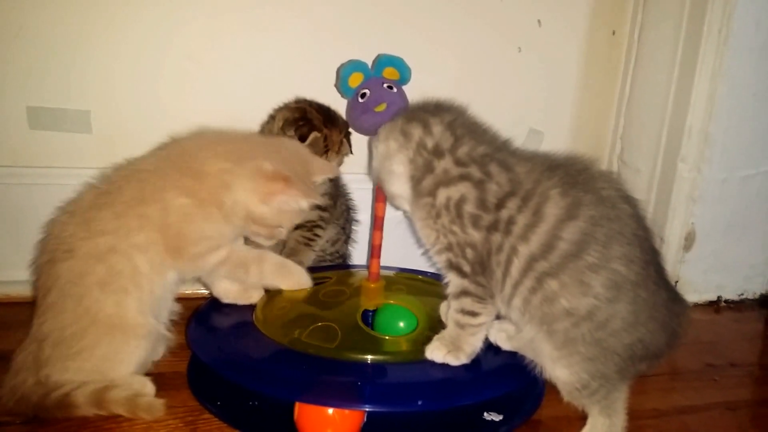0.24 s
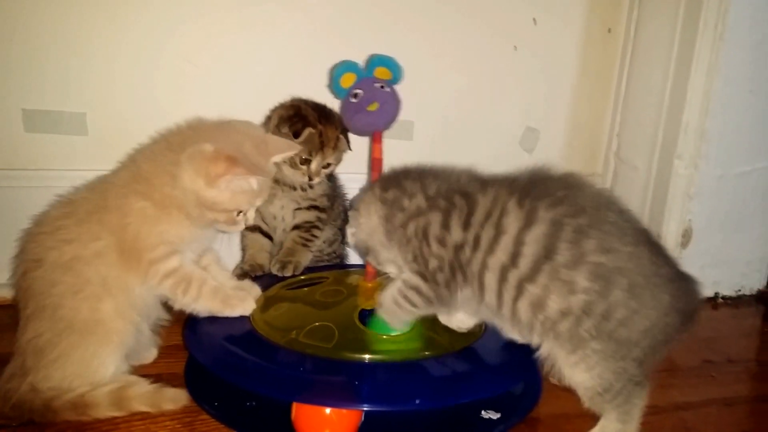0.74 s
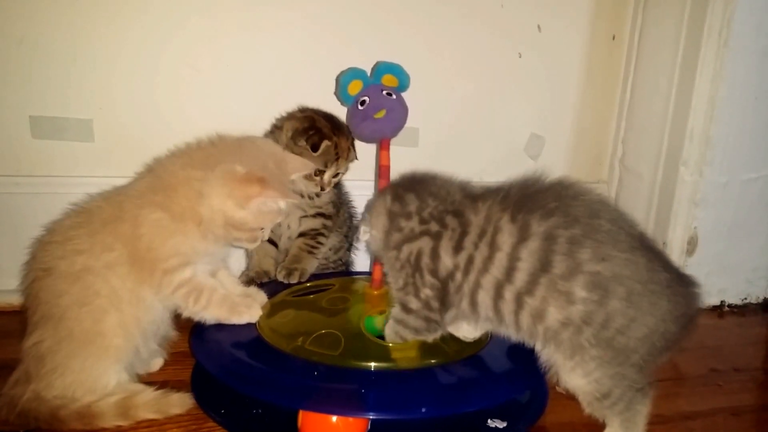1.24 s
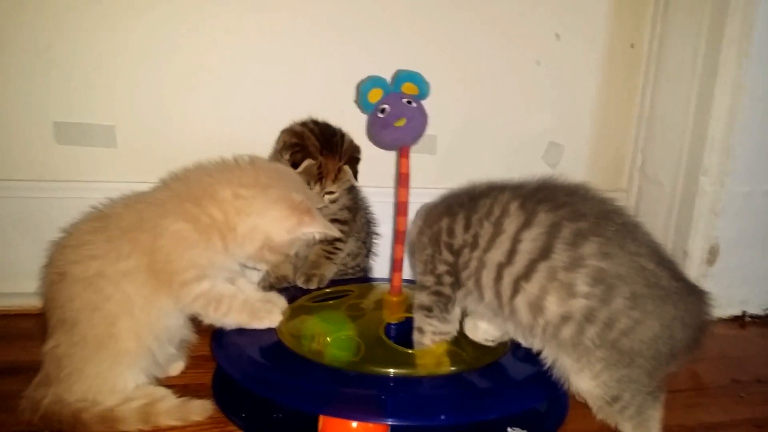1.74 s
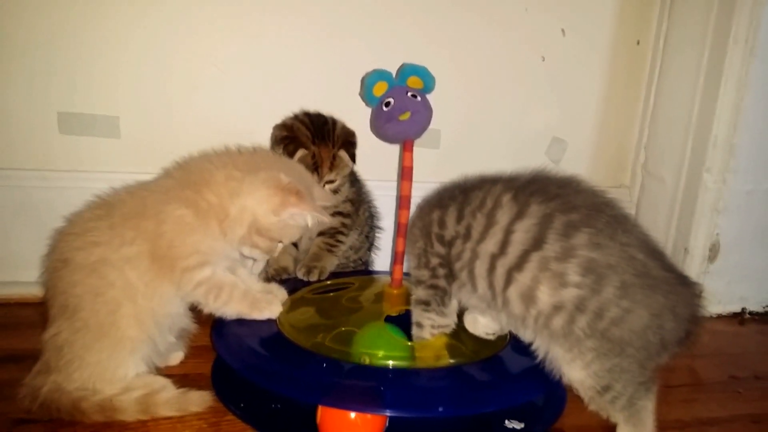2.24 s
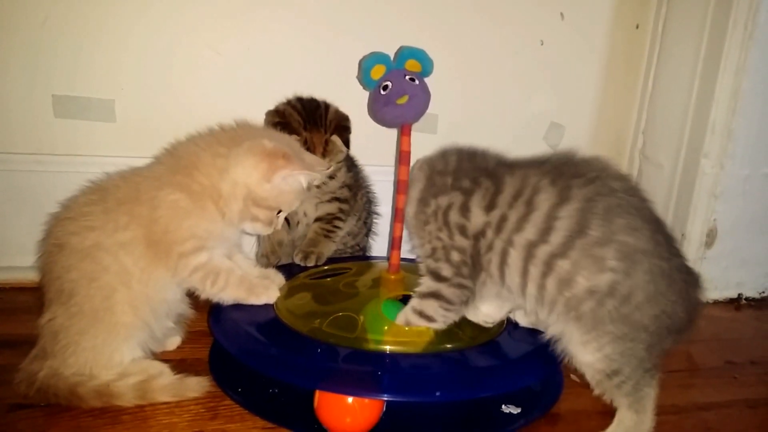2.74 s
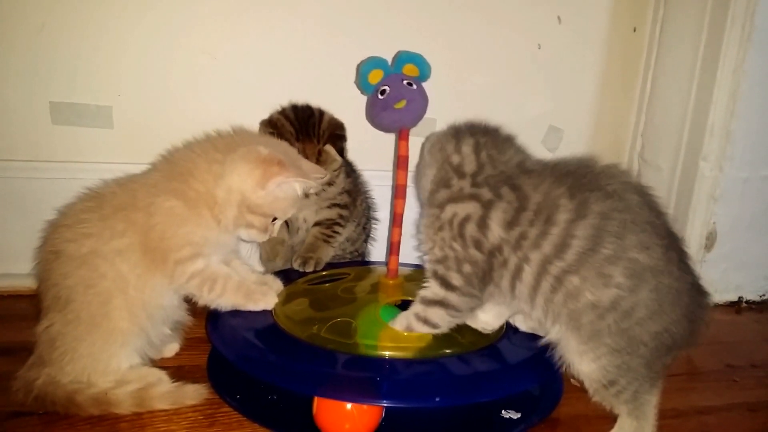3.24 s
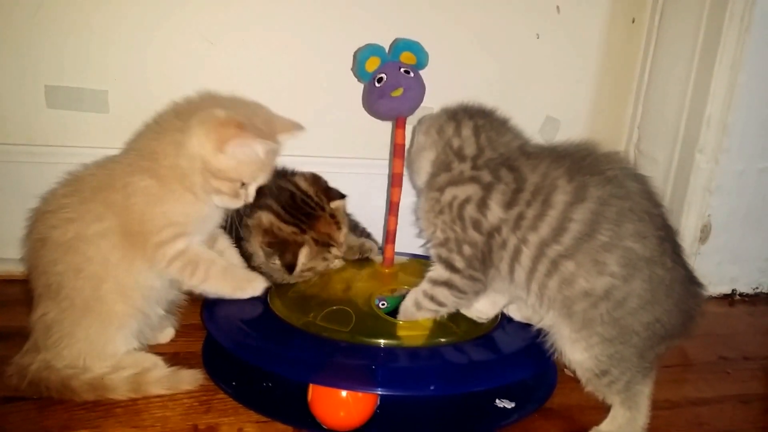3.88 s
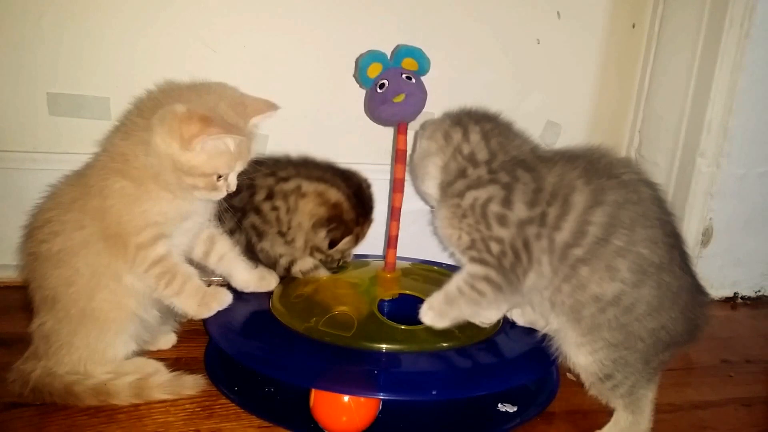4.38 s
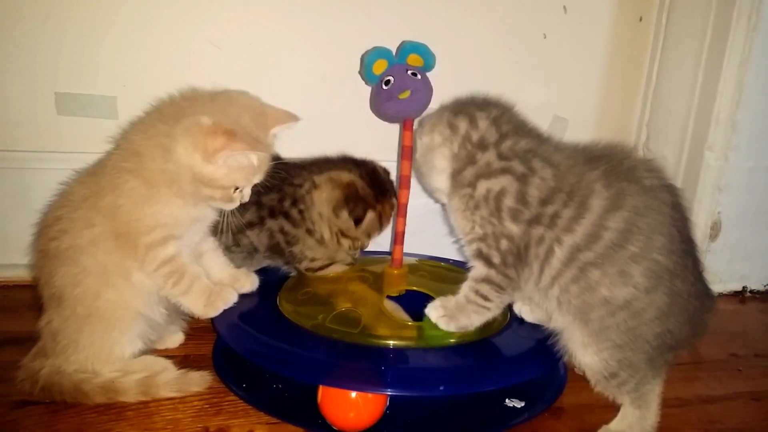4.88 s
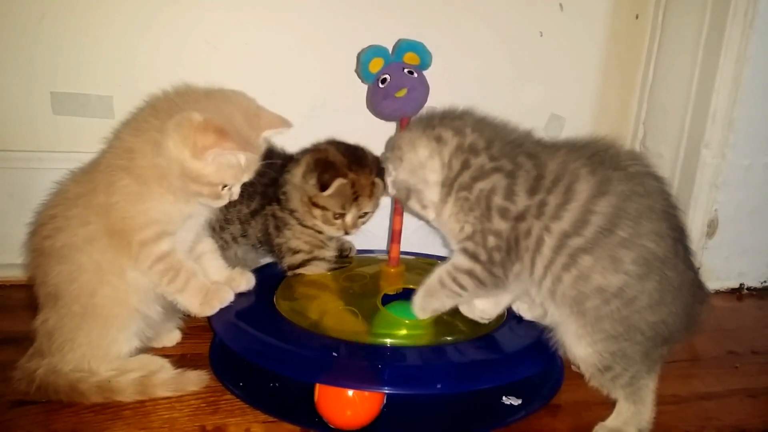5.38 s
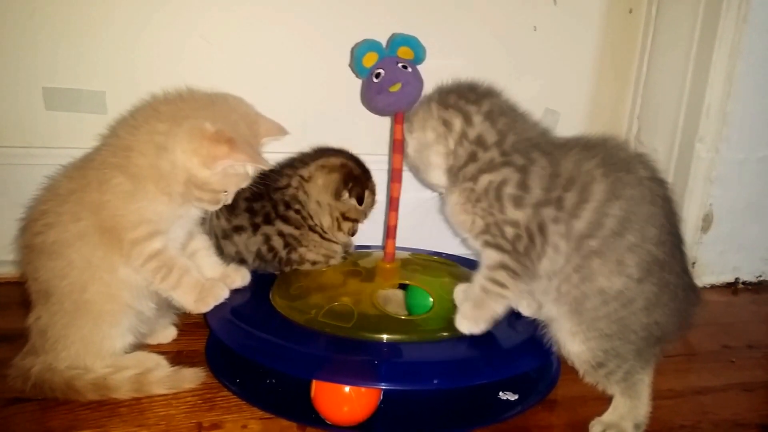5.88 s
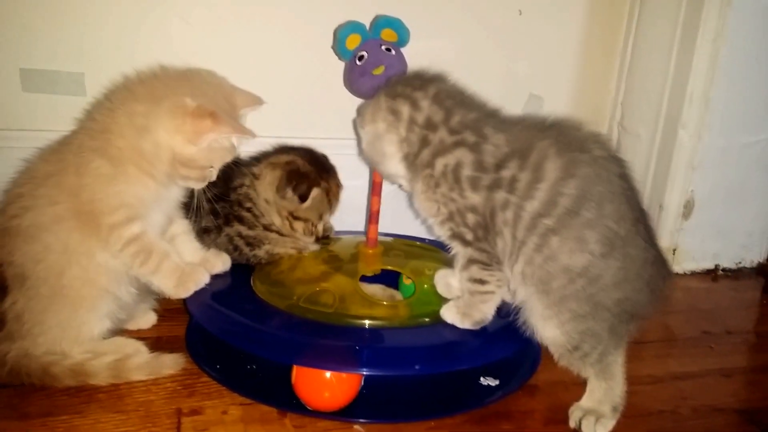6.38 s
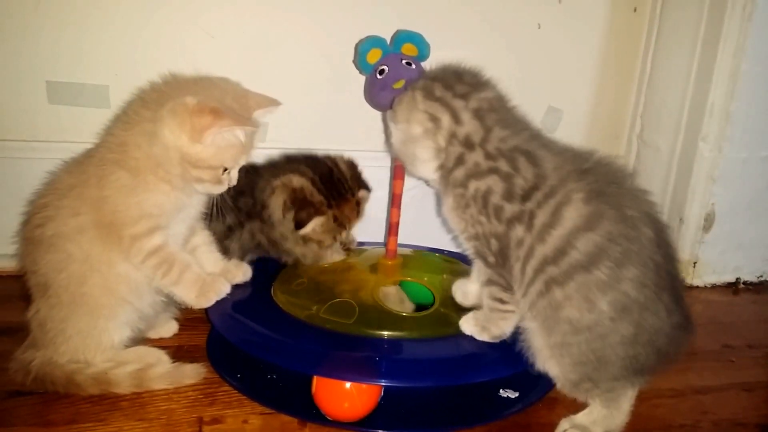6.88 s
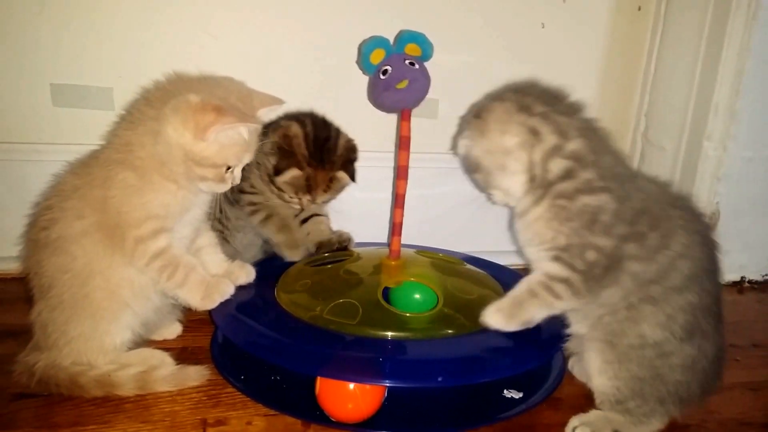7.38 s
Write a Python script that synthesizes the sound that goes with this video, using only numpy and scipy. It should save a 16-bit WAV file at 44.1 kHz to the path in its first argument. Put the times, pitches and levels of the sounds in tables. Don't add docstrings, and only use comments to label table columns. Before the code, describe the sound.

Close stereo microphone in a small bare room with a wooden floor. Faint ball taps come first, then a quick cluster of hollow paw knocks at one second, scattered rattling taps, and a quieter lull. Single swats and loud bursts follow, with claw clicks, lid buzz and short rolling. A distant clock ticks faintly over low house hum and soft hiss.

```python
import sys
import numpy as np
from scipy import signal
from scipy.fft import rfft, irfft, next_fast_len
from scipy.io import wavfile
from scipy.ndimage import uniform_filter1d

SR = 44100
rng = np.random.default_rng(int(sys.argv[2]) if len(sys.argv) > 2 else 0)


def amp(db):
    return 10 ** (np.asarray(db, float) / 20)


def write(x):
    x = np.atleast_2d(x).T
    wavfile.write(sys.argv[1], SR, np.round(np.clip(x, -1, 1) * 32767).astype(np.int16))


N = 336042

# start_s [s], peak_db [dB]
CLOCK_TICKS = [
    (0.311, -47.5),
    (1.5023, -42),
    (2.068, -44.5),
    (3.2635, -45.5),
    (4.4467, -40.5),
    (5.0873, -44),
    (5.657, -45.5),
    (6.2696, -43),
    (7.4739, -45),
]
# time_s [s], level_db [dB]
ROLL_LEVEL = [(0.0, -44), (0.7, -54), (0.9, -34), (1.17, -26), (1.45, -60), (2.45, -56), (2.76, -37.5),
              (3.1, -75), (3.78, -30), (4.05, -82), (4.5, -41), (4.69, -17), (4.85, -46), (5.1, -39.5),
              (5.7, -51.5), (6.45, -85), (7.1, -36), (7.62, -53.5)]
# pitch_hz [Hz], level_db [dB], t60_s [s]
SHELL_AIR = [(442, -4, .14), (490, -9, .1), (526, 0, .2), (591, -1, .17), (646, -8, .1), (700, -9, .08)]
# pitch_hz [Hz], level_db [dB], t60_s [s]
SHELL_WALLS = [(760, -2, .07), (829, -3, .07), (890, -2, .08), (948, -2, .08), (1067, -5, .05),
               (1229, -6, .04), (1369, -6, .04), (1471, -5, .04), (1580, -7, .03), (1800, -10, .02),
               (2100, -8, .025), (2400, -12, .015)]
# pitch_hz [Hz], level_db [dB], t60_s [s]
FLOORBOARDS = [(146, -3, .14), (184, 0, .2), (205, -3, .15), (290, -6, .15), (330, -9, .12)]
# pitch_hz [Hz], level_db [dB], t60_s [s]
CLOCK_MODES = [(2000, -7, .004), (3200, -6, .003), (4600, -9, .002), (6100, -7, .002), (7400, -5, .002),
               (8500, -2, .004), (9800, -5, .002)]
# pitch_hz [Hz], t60_s [s]
ROOM_DECAY = [(100, 0.82), (300, 0.23), (700, 0.36), (1800, 0.45), (5000, 0.38), (12000, 0.21)]
# pitch_hz [Hz], level_db [dB per Hz]
HOUSE_SPECTRUM = [(15, -60), (25, -45), (43, -47), (59, -29), (79, -5), (135, -6.5), (279, -10.5),
                  (412, -28), (525, -13.5), (588, -18.5), (1200, -37.5), (1560, -74), (2640, -120)]
# pitch_hz [Hz], likeness [0-1]
STEREO_LIKENESS = [(60, 1), (300, 0.94), (600, 0.62), (1200, 0.53), (3000, 0), (12000, 0)]
# pitch_hz [Hz], left_minus_right_db [dB]
PORT_SHADING = [(60, -4), (250, -4.5), (1000, -5.8), (2200, -6), (3200, 0), (4300, 4), (5600, 0),
                (7200, -11), (10000, -10), (13000, -4)]
# pitch_hz [Hz], level_db [dB per Hz]
HISS_SPECTRUM = [(600, -5), (1000, -6.5), (1500, -8), (2200, -7.5), (3200, -12.5), (4300, -12.5),
                 (5300, -14), (6500, -6.5), (8200, -15.5), (10500, -20.5), (12200, -17.5), (14500, -20.5)]
# start_s [s], peak_db [dB], hardness_db (upper modes) [dB], pitch_hz (favoured air) [Hz], ring_length [0-1]
PAW_SWATS = [(0.991, -7.5, -14, 530, 0.31), (1.03, -4, -15, 554, 0.28), (1.08, -7, -11.5, 517, 0.34),
             (1.177, -21, -19, 503, 0.67), (2.642, -8.5, -12.5, 675, 0.54), (3.611, -8, -9.5, 585, 0.38),
             (3.633, -7.5, -7.5, 606, 0.43), (3.649, -10.5, -13.5, 590, 0.55),
             (3.72, -3.5, -10.5, 556, 0.37), (3.743, -1.5, -20.5, 450, 0.43),
             (3.762, -4.5, -12.5, 506, 0.33), (3.823, -8, -22.5, 527, .1), (4.504, -9, -10.5, 610, 0.23),
             (4.608, -0.5, -20, 520, 0.21), (4.636, -12, -17, 530, 0.37), (4.67, -18, -20, 487, 0.8),
             (4.725, -13.5, -19.5, 525, .35), (5.815, -0.5, -13, 607, 0.39), (5.854, -8, -19, 520, 0.3),
             (5.921, -10, -12.5, 518, 0.44), (5.957, -19, -22, 576, 0.24), (6.956, -1, -19.5, 478, 0.2),
             (7.085, -5.5, -14, 525, 0.34), (7.119, -13, -16.5, 516, 0.43)]
# start_s [s], peak_db [dB], hardness_db [dB], pitch_hz (favoured air) [Hz]
BALL_TAPS = [(0.209, -26, -14, 616), (0.422, -33, -25, 596), (0.641, -53.5, 4.5, 613),
             (0.884, -30, -25, 594), (0.921, -35, -3.5, 528), (1.273, -21.5, -9.5, 550),
             (1.304, -25.5, -23, 613), (1.39, -20.5, -17.5, 560), (1.43, -24.5, -24.5, 553),
             (1.493, -18.5, -20.5, 537), (1.641, -22, -17.5, 547), (1.751, -20, -15.5, 595),
             (1.826, -28, -20.5, 526), (1.883, -30.5, -20.5, 553), (1.931, -27, -21, 580),
             (2.042, -27, -24, 540), (2.063, -30.5, -16.5, 520), (3.502, -38, -13.5, 610),
             (4.297, -29.5, -13, 520), (4.389, -22.5, -23, 620), (4.487, -25, -17, 573),
             (4.798, -22, -10.5, 530), (4.933, -29, -30, 540), (5.013, -26.5, -22, 535),
             (5.253, -30.5, -16, 532), (5.773, -27.5, -12, 595), (6.191, -22.5, -13.5, 563),
             (6.215, -17.5, -13.5, 560), (6.851, -16.5, -17.5, 605), (6.906, -19, -24.5, 650)]
# start_s
# [s], peak_db [dB]
BALL_NUDGES = [(0.274, -48), (0.709, -49), (6.945, -20), (0.831, -39.5), (1.105, -15), (1.132, -18.5),
               (1.24, -29), (1.37, -32.5), (1.651, -25.5), (3.784, -14), (2.309, -46), (3.55, -33),
               (3.802, -15.5), (4.448, -43), (4.535, -29), (4.711, -15), (5.167, -34), (5.226, -46),
               (5.328, -34.5), (5.374, -39), (5.749, -33.5), (5.845, -15), (5.994, -42), (6.11, -39),
               (6.251, -28.5), (6.62, -42)]
# start_s [s], peak_db [dB], top_db (share above 5
# kHz) [dB]
CLAW_CLICKS = [(0.6714, -40, -9), (0.7646, -45, -14), (0.8083, -36, -5), (0.8735, -32, -11.5),
               (1.0147, -37.5, 4), (1.0406, -12, -19), (1.6493, -44, -30), (2.6075, -59, 2),
               (2.642, -39.5, 2.5), (3.5289, -38, -12), (3.631, -32, 2.5), (3.721, -24, -12),
               (3.8211, -21.5, -8.5), (4.2961, -32, -29), (4.6067, -12, -24), (4.6964, -28, -24),
               (5.3769, -30.5, -17.5), (5.49, -60, 4), (5.794, -49.5, -1), (5.811, -15, -27),
               (5.945, -45, -10), (6.849, -36, -18.5), (7.0828, -21, -36)]
# peak_s [s], level_db [dB], half_length_s [s]
RUMBLE_SWELLS = [(0.0, -43, 0.11), (1.1, -37, 0.25), (1.85, -36.5, 0.39), (2.67, -40.5, 0.11),
                 (3.3, -50, 0.13), (3.75, -32.5, 0.12), (4.1, -43.5, 0.25), (4.65, -40.5, 0.18),
                 (5.1, -39, 0.26), (5.9, -38, .15), (6.25, -45, 0.082), (6.97, -41, 0.064),
                 (7.36, -35, 0.16)]
# time_s [s], level_db [dB]
FUR_RUSTLE = [(0.0, -61.5), (0.6, -67), (1.3, -62.5), (2.4, -67.5), (3.3, -69), (4.2, -69.5), (5.1, -64),
              (6.6, -71), (7.62, -61.5)]
# start_s [s], peak_db [dB]
WEIGHT_THUDS = [(0.921, -41.5), (1.08, -32), (1.105, -34), (2.642, -27.5), (2.657, -35), (3.762, -26.5),
                (4.608, -31), (4.67, -39), (5.013, -42), (5.374, -48), (5.921, -32.5), (5.957, -35),
                (6.956, -43), (7.085, -30), (7.119, -28.5)]
# pitch_hz [Hz], level_db [dB], t60_s [s]
LID_MODES = [(1478, -3, 0.095), (2083, -2, 0.11), (2248, -5, 0.05), (2695, -1.5, 0.038), (3250, -7.5, .06),
             (3583, -9, 0.053)]

NUDGE_HARD_DB, NUDGE_HZ = -18, 535
REBOUND_S, REBOUND_LOSS_DB = .014, 11
LIGHT_WEIGHT_DB, WEIGHT_SLOPE = -18.5, -0.62
RING_SHARE, DAMP_PER_DB = 0.59, -0.0166
SWAT_CRACK_DB, TAP_CRACK_DB, NUDGE_CRACK_DB = -3, -4.5, -7
SWAT_TOP_DB, LIGHT_TOP_DB = -13.5, -17.5
SCUFFLE_DB, SCUFFLE_T60_S = -54, 0.54
HOUSE_DB, RUMBLE_FLOOR_DB = -57.5, -54.5


def at_hz(points, hz):
    table = np.array(points)
    return np.interp(np.log(hz), np.log(table[:, 0]), table[:, 1])


def in_time(rows):
    s, level_db = np.transpose(rows)
    return amp(np.interp(np.arange(N) / SR, s, level_db))


def rms_one(x):
    return x / np.sqrt(np.mean(x ** 2) + 1e-20)


def band(x, low_hz, high_hz):
    sos = signal.butter(2, [low_hz, min(high_hz, .45 * SR)], "band", fs=SR, output="sos")
    return signal.sosfilt(sos, x)


def coloured(x, gain_of_hz):
    size = next_fast_len(N)
    hz = np.maximum(np.fft.rfftfreq(size, 1 / SR), 1)
    return irfft(rfft(x, size) * gain_of_hz(hz), size)[..., :N]


def train(times, sizes):
    out = np.full(N, 1e-18)
    at = np.clip((np.asarray(times) * SR).astype(int), 0, N - 1)
    np.add.at(out, at, sizes)
    return out


def die_away(hits, t60_s):
    return signal.lfilter([1], [1, -amp(-60 / (t60_s * SR))], hits)


def ring(clicks, hz, t60_s):
    r, w = amp(-60 / (t60_s * SR)), 2 * np.pi * hz / SR
    return signal.lfilter([0, np.sin(w)], [1, -2 * r * np.cos(w), r * r], clicks)


def strike(times, level_db, modes, scatter_db, apart, rise, length=1.0):
    hz, mode_db, t60 = np.transpose(modes).astype(np.float32)
    spread = (hz[:, None] / 1000) ** 3
    out = np.zeros((2, N + SR))
    t = np.arange(int(SR * min(.6 * t60.max(), .15)), dtype=np.float32) / SR
    luck = rng.standard_normal((len(times), 3, len(modes))).astype(np.float32)
    levels = amp(np.reshape(level_db, (len(times), -1)) + mode_db + scatter_db * luck[:, 0])
    lengths = np.broadcast_to(length, len(times))
    swell = (1 - np.exp(-np.outer(hz, t) / rise)) ** 2
    for s, level, (_, detune, side), share in zip(times, levels, luck, lengths):
        phase = 2 * np.pi * np.outer(hz * (1 + .008 * detune), t) + spread * side[:, None]
        decay = amp(-60 * t / (t60[:, None] * np.clip(share, .1, 1.5)))
        fade = level[:, None] * decay * swell
        sway = np.tanh(apart * side * hz / 1000)
        mid = (np.sin(phase) * fade).sum(axis=0)
        across = sway @ (np.cos(phase) * fade)
        i = round(s * SR)
        out[:, i:i + len(t)] += mid + across * [[1], [-1]]
    return out[:, :N]


def noise_bank(length, shape, count):
    out, edges = 0, 22 * 2 ** (np.arange(count + 1) / 3)
    white = rng.standard_normal((2, 2, length))
    for k, (low, high) in enumerate(zip(edges, edges[1:])):
        mid, side = band(white[k % 2], low, high)
        hz = np.sqrt(low * high)
        alike = np.clip(at_hz(STEREO_LIKENESS, hz), 0, 1)
        across = np.sqrt(1 - alike) * side * [[1], [-1]]
        out = out + shape(hz) * (np.sqrt(1 + alike) * mid + across)
    return out


def grit():
    grains = rms_one(uniform_filter1d(rng.standard_normal(N), size=110))
    noise = .5 * rng.standard_normal(N) + rng.standard_normal((2, N))
    return rms_one(noise * amp(5.5 * grains))


def blows():
    def light(s, db, hard_db, hz, crack_db):
        length = RING_SHARE - DAMP_PER_DB * (db + 30)
        return s, db, hard_db, hz, length, crack_db, LIGHT_TOP_DB
    rows = [(*row, SWAT_CRACK_DB, SWAT_TOP_DB) for row in PAW_SWATS]
    rows += [light(*row, TAP_CRACK_DB) for row in BALL_TAPS]
    rows += [light(s, db, NUDGE_HARD_DB, NUDGE_HZ, NUDGE_CRACK_DB) for s, db in BALL_NUDGES]
    rows += [(s + REBOUND_S, db - REBOUND_LOSS_DB, hard_db, hz, length, NUDGE_CRACK_DB, LIGHT_TOP_DB)
             for s, db, hard_db, hz, length in PAW_SWATS]
    return np.transpose(rows)


def house_noise():
    noise = noise_bank(N, lambda hz: amp(at_hz(HOUSE_SPECTRUM, hz)), count=18)
    return amp(HOUSE_DB) * rms_one(noise)


def hiss_and_fur():
    hiss = rms_one(coloured(rng.standard_normal((2, N)), lambda hz: amp(at_hz(HISS_SPECTRUM, hz))))
    s, peak_db = np.transpose(PAW_SWATS)[:2]
    scuffle = die_away(train(s, amp(peak_db + SCUFFLE_DB)), SCUFFLE_T60_S)
    return amp(7.5) * (in_time(FUR_RUSTLE) + scuffle) * hiss


def rumble():
    t = np.arange(N) / SR
    swell = amp(RUMBLE_FLOOR_DB)
    for at, db, half in RUMBLE_SWELLS:
        swell = swell + amp(db) * np.exp(-((t - at) / half) ** 2)
    return amp(-12) * swell * rms_one(band(rng.standard_normal(N), 68.0, 95.4))


def roll():
    sizes = amp(3.3 * np.minimum(rng.exponential(1, N), 4)) * rng.choice([-1, 1], N)
    contacts = rng.random(N) < 220 / SR
    bumps = sizes * contacts * in_time(ROLL_LEVEL) + 1e-18

    def body(modes):
        return sum(amp(db) * ring(bumps, hz, t60) * (-1) ** k for k, (hz, db, t60) in enumerate(modes))
    return amp(-25.5) * body(SHELL_AIR) + amp(-26.5) * body(SHELL_WALLS)


def knocks():
    s, peak_db, hard_db, pitch_hz, length = blows()[:5]
    weight_db = peak_db + LIGHT_WEIGHT_DB + WEIGHT_SLOPE * (peak_db + 30)
    thud_s, thud_db = np.hstack([np.transpose(WEIGHT_THUDS), [s, weight_db]])
    off_pitch = np.abs(np.log(pitch_hz[:, None] / np.array(SHELL_AIR)[:, 0]))
    air_db = peak_db[:, None] - 4.5 - np.minimum(32 * off_pitch, 11.0)
    hollow = strike(s, air_db, SHELL_AIR, scatter_db=3.5, apart=0.53, rise=0.96, length=length)
    walls = strike(s, peak_db + hard_db + 2.0, SHELL_WALLS, scatter_db=4.5, apart=1.0, rise=0.99, length=length)
    boards = strike(thud_s, thud_db + 1.0, FLOORBOARDS, scatter_db=6.0, apart=.6, rise=1.57)
    chatter = die_away(train(s, amp(peak_db + hard_db - 4.5)), .15) * grit()
    return hollow + walls + boards + band(chatter, 450, 3170)


def clicks():
    s, blow_db, hard_db, _, _, crack_db, top_db = blows()
    cracks = [s - .001, blow_db + hard_db + crack_db, top_db]
    s, peak_db, top_db = np.hstack([cracks, np.transpose(CLAW_CLICKS)])
    noise = grit()
    out = 0
    for level_db, low_hz, high_hz in ((peak_db, 1500, 5200), (peak_db + top_db + 12.0, 5200, 11500)):
        hits = train(s, amp(level_db))
        crack, buzz = die_away(hits, 0.016), die_away(hits, .16)
        out = out + band((crack + amp(-24) * buzz) * noise, low_hz, high_hz)
    return out


def lid():
    s, peak_db, hard_db, _, _, crack_db, _ = blows()
    level_db = peak_db + hard_db + crack_db - 14.5
    return strike(s, level_db, LID_MODES, scatter_db=4.5, apart=.7, rise=.7) * amp([[-2.5], [2.5]])


def clock():
    s, peak_db = np.transpose(CLOCK_TICKS)
    return strike(s, peak_db - 3, CLOCK_MODES, scatter_db=1.5, apart=.3, rise=.6)


def room(x):
    t = np.arange(SR // 2) / SR
    tail = noise_bank(len(t), lambda hz: amp(-60 * t / at_hz(ROOM_DECAY, hz)), count=29)
    tail = tail * (1 - np.exp(-t / 0.0017))
    tail = tail / np.sqrt(np.sum(tail ** 2) / 2)
    return signal.fftconvolve(x[None], tail, axes=1)[:, :N]


def scene():
    shell, sharp, far = knocks() + roll(), clicks(), clock()
    direct = shell + sharp + amp(-19) * far
    direct[1] = np.roll(direct[1], 3)
    wet = amp(-7.0) * shell + amp(-6) * sharp + amp(14) * far
    sides = np.array([[1], [-1]])
    near = coloured(direct + room(wet[0]), lambda hz: amp(at_hz(PORT_SHADING, hz) / 2 * sides))
    background = house_noise() + hiss_and_fur() + rumble()
    return near + background * amp([[-2.1], [2.1]]) + lid()


def top_cut(x):
    return signal.sosfilt(signal.butter(12, 16540, fs=SR, output="sos"), x)


def record(dry):
    x = coloured(dry, lambda hz: amp(np.interp(hz, [14450, 14600], [0, -23])))
    x = signal.sosfilt(signal.butter(2, 58, "high", fs=SR, output="sos"), x)
    return top_cut(0.95 * np.tanh(x / 0.91))


dry = scene()
out = record(dry)
write(out)
```